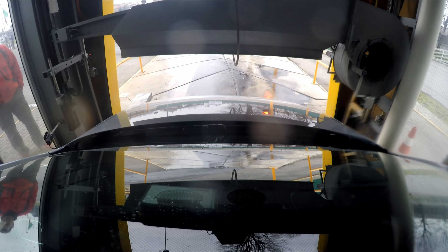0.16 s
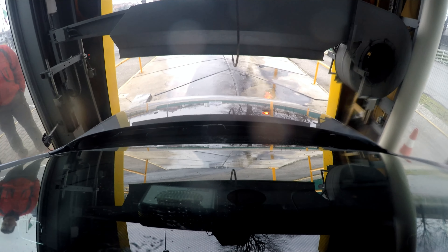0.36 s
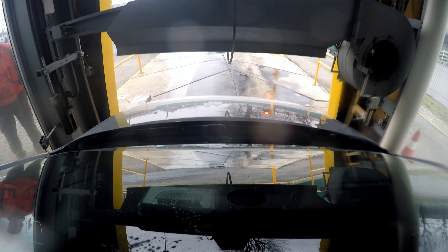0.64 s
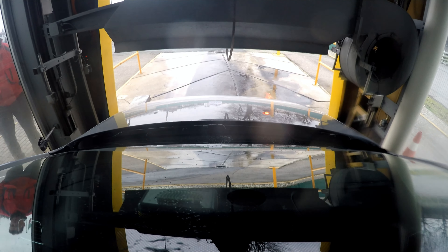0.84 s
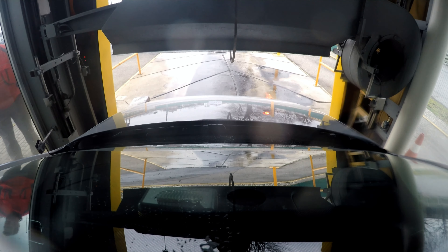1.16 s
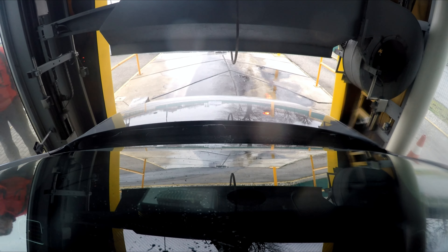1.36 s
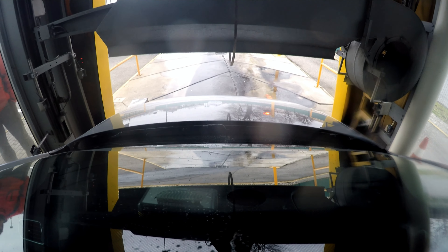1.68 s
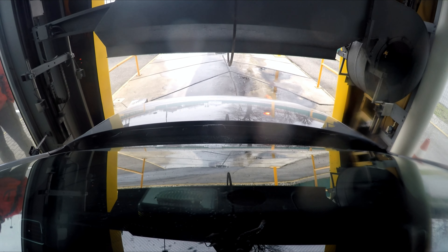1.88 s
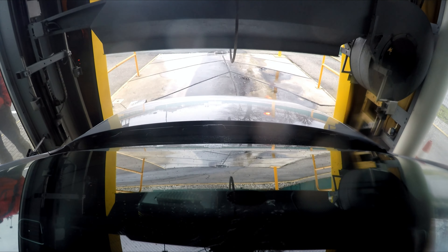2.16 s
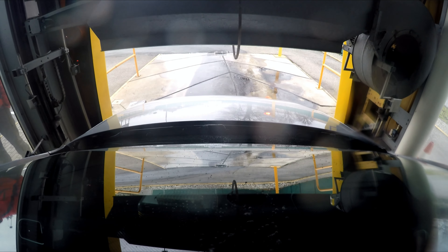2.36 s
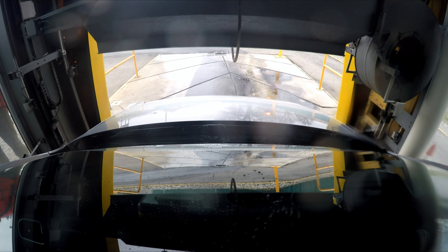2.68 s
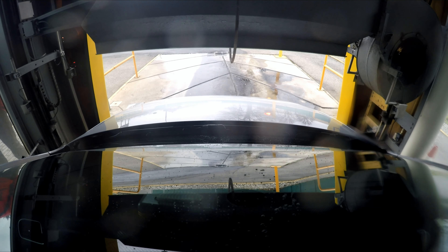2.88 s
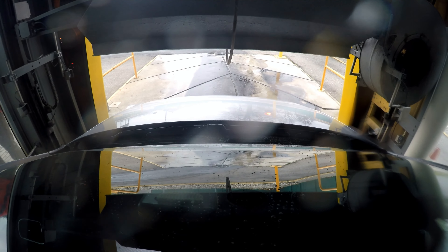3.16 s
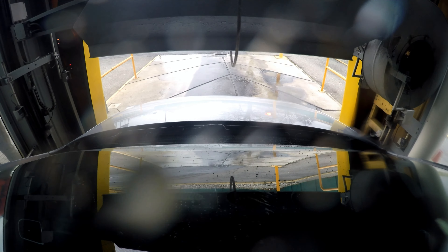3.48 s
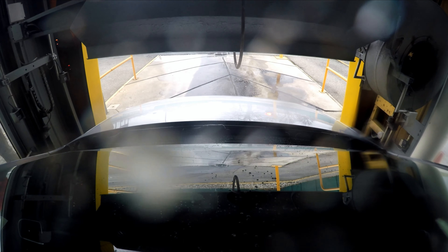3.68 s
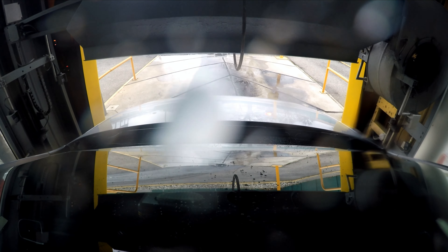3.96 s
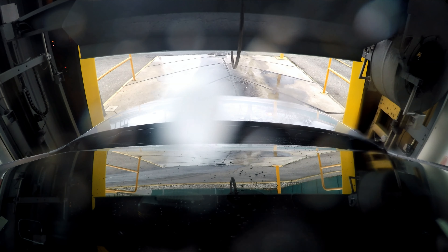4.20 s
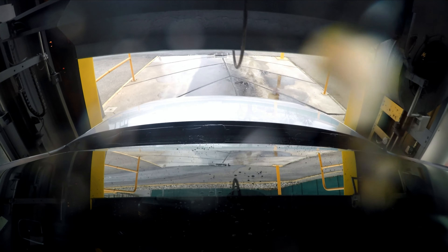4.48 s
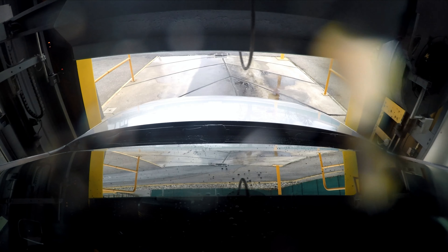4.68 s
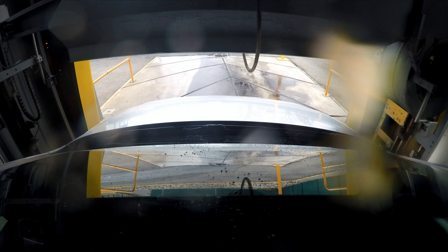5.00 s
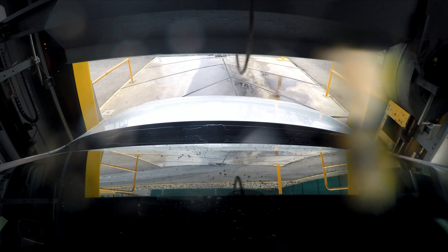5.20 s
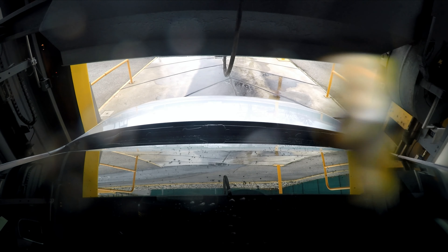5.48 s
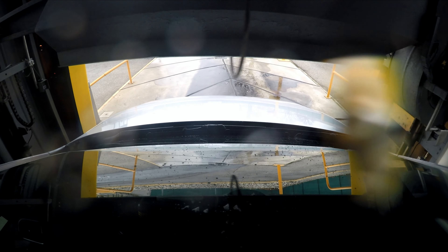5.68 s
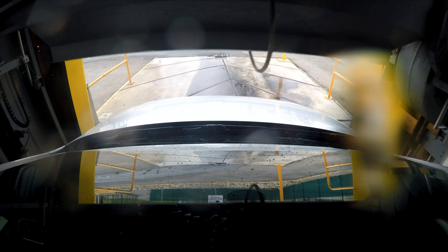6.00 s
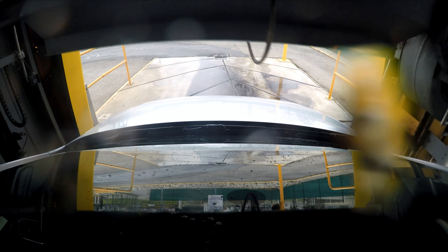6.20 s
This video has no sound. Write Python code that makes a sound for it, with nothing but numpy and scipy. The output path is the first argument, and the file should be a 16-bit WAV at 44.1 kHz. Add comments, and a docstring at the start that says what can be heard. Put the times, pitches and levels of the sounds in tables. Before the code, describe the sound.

Heard from the outside of a car rolling under car wash blowers, a loud rush of air batters the microphone in irregular gusts, rumbling, hissing and lightly whistling. Beneath it the fans keep up a steady roar and whine, with a soft spatter of spray. The fans swell in the last part, joined by a few tiny drop ticks.

```python
"""Car wash dryer.

A car rolls under the blowers with a camera riding on its outside. The fans roar and whine, louder
towards the end. Their turbulent jet buffets the microphone, makes the camera's housing whistle
and hiss in gusts, and flings spray and a few water drops against it."""
import sys
import numpy as np
from scipy import signal
from scipy.fft import rfft, irfft, next_fast_len
from scipy.io import wavfile
from scipy.ndimage import uniform_filter1d, map_coordinates

SR = 44100
rng = np.random.default_rng(int(sys.argv[2]) if len(sys.argv) > 2 else 0)


def int16_out(signal):
    """Quantize to a 16-bit WAV file."""
    q = np.round(np.clip(np.atleast_2d(signal).T, -1, 1) * 32767)
    wavfile.write(sys.argv[1], SR, q.astype(np.int16))


N = 279594

# fan level along the car's path: time_s, level_db
FAN_LEVEL = [(0, -44.5), (1.3, -44.5), (2.4, -46), (3.3, -42.5), (3.7, -42.5), (4.1, -42.5), (4.7, -43),
             (5.05, -40), (5.35, -37), (5.8, -36.5), (6.34, -35.5)]
# mean flow over the camera: time_s, throb_db, buffet_db, whistle_db, hiss_db
MEAN_FLOW = [(0, -14, -18, -28, -30), (.95, -15, -18.5, -25.5, -28), (1.2, -14.5, -23, -29.5, -32.5),
             (1.95, -16, -22, -28.5, -32), (2.65, -19, -19.5, -27, -34), (3.05, -18.5, -20.5, -29.5, -35.5),
             (3.7, -14.5, -19, -27, -32.5), (4.1, -11, -22, -33.5, -41.5), (4.45, -18.5, -26, -31, -34.5),
             (4.8, -14.5, -25.5, -34.5, -36.5), (5.3, -16.5, -23.5, -36, -33), (6.34, -14, -25, -48, -31)]
# jet swings onto the camera: centre_s, width_s, mic_push_db, housing_skim_db
JET_GUSTS = [(.025, 0.074, 2, 4.5), (0.15, 0.03, -4.5, 4.5), (0.285, 0.066, 1, 4.5), (0.388, 0.036, 3, 4),
             (0.468, 0.054, 0, 6), (0.664, 0.023, 2.5, 3.5), (0.81, .05, 2, 3), (0.907, 0.061, 3.5, 2.5),
             (1.052, 0.033, -1.5, 5), (1.09, 0.14, 3, -2), (1.24, 0.092, 4, 5), (1.395, 0.026, 6.5, -3),
             (1.503, 0.12, 8, -0.5), (1.786, 0.077, 8, 4), (2.143, 0.019, 9, 4), (2.262, .06, 4, 5),
             (2.404, 0.063, 6.5, 3), (2.592, 0.032, 1, 5.5), (2.756, 0.1, 2.5, 3.5), (2.87, 0.022, 0, 3),
             (3.074, 0.092, 2, 0.5), (3.343, 0.054, 2.5, -1), (3.444, 0.033, 4, 5),
             (3.612, 0.059, 3.5, 1.5), (3.85, 0.11, -0.5, 2.5), (4.03, 0.031, 6.5, 6.5),
             (4.282, 0.059, 6, 3), (4.36, 0.03, 7.5, 3), (5.016, 0.074, 4.5, 0.5), (5.287, 0.12, 2, -1),
             (5.629, 0.028, 8, 0), (5.81, .08, 6.5, 3), (6.13, 0.043, 9, -9)]
# jet swings clear: centre_s, width_s, depth_db
JET_LULLS = [(0.096, 0.029, 2.5), (.2, 0.043, 3.5), (0.518, 0.035, 6), (0.74, 0.089, 4), (1.18, 0.028, 9.5),
             (1.308, 0.055, 8), (1.62, 0.054, 3), (2.197, 0.02, 8), (3.963, 0.058, 10), (4.148, 0.076, 11),
             (4.586, 0.053, 2), (4.842, .06, 9), (5.092, 0.037, 3), (5.69, 0.039, 11), (5.908, 0.062, 1)]
# biggest vortices shed by the camera: centre_s, throb_boost_db
BIG_VORTICES = [(.06, 6), (.96, 5.5), (1.22, 6.5), (1.54, 10), (1.8, 3), (2.04, 4.5), (2.44, 9), (2.81, 8),
                (3.62, 3.5), (4.37, 5.5), (5.41, 6.5), (5.97, 4), (6.33, 4.5)]
# eddies bursting on the housing: peak_s, level_db, decay_s
EDDY_BURSTS = [(0.006, -26, 0.0093), (0.038, -22, 0.0051), (0.587, -20, 0.008), (0.809, -18, 0.01),
               (0.894, -30, 0.028), (1.029, -12, 0.0064), (1.219, -21, 0.01), (1.495, -15, 0.0038),
               (1.537, -16, 0.012), (1.628, -21.5, 0.011), (1.787, -19.5, 0.006), (2.011, -16.5, 0.007),
               (2.107, -22, 0.015), (2.354, -27, 0.009), (2.442, -15.5, 0.0072), (2.55, -18.5, 0.0062),
               (2.762, -20, 0.008), (2.819, -19, 0.004), (3.05, -22, 0.0058), (3.25, -22, 0.005),
               (3.579, -22, 0.021), (3.687, -21, 0.007), (3.856, -20, 0.007), (3.884, -22, 0.011),
               (4.037, -22, 0.0062), (4.28, -21.5, 0.0069), (4.359, -23, 0.014), (4.92, -23, 0.0085)]
# water drops on the housing: start_s, level_db
DROP_HITS = [(4.8818, -36), (5.3088, -32), (5.7369, -35), (5.792, -28), (5.875, -38), (5.9643, -38),
             (6.1549, -30), (6.2816, -45)]

# noise spectra: freq_hz, density_db
FAN_ROAR_SPECTRUM = [(60, -19), (380, 3), (520, -3), (850, -6.5), (1130, 0), (1480, -4.5), (1800, -1),
                     (2700, -3), (3350, -14.5), (4300, -13.5), (5500, -12), (6700, -18.5), (7800, -27),
                     (9600, -29.5), (15000, -43)]
DROP_SPECTRUM = [(2000, -12), (6000, 5), (10500, -1), (13000, -4), (15500, -7)]
DROPLET_SPECTRUM = [(1000, -14), (2300, 6), (3000, 2), (3900, -5), (5300, -12), (7800, -20), (9800, -23),
                    (11000, -27), (12300, -26), (15000, -37)]
HOUSING_HISS_SPECTRUM = [(400, -1), (900, -8), (1450, -9), (1900, 0.5), (2800, 7), (3300, -2), (4100, -2.5),
                         (4700, -5.5), (5250, -24), (6000, -16), (6600, -17.5), (7700, -18), (9700, -23.5),
                         (10600, -27), (12400, -32), (15000, -56)]
HARD_FLOW_SPECTRUM = [(1500, -18), (2600, 5), (3300, 3), (4200, 3.5), (4700, -8.5), (5250, 0), (6200, -34),
                      (9700, -29), (15000, -40)]
WAKE_THROB_SPECTRUM = [(8, -43), (22, -6), (36, -5.5), (46.5, 1.5), (55, -6), (66, -15.5), (110, -20),
                       (300, -107)]
MIC_BUFFET_SPECTRUM = [(30, -14), (65, 4.5), (90, 1.5), (135, -3), (230, -8), (400, -18), (600, -30.5),
                       (1200, -38), (4000, -73)]
MIC_THUMP_SPECTRUM = [(80, -2.5), (170, 6), (280, 4.5), (430, 2), (600, -16), (1200, -16), (4000, -35.5)]

# resonances and narrow noise bands: centre_hz, width_hz, level_db
BLADE_TONES = [(577.6, 9.6, -4.5), (728, 14, -9), (1154, 11, -7), (1172, 120, 0), (1320, 23, -10),
               (1703, 67, -2.8)]
NOZZLE_MODES = [(3685, 300, 0)]
CAVITY_MODES = [(1845, 610, -2), (2100, 410, 4), (2260, 150, -2)]
HOUSING_EDGE_TONE = [(2257, 260, 0)]
HOUSING_UPPER_MODES = [(5240, 630, 4), (6720, 240, -5), (9700, 500, -11.5), (12000, 900, -15)]


def amp(db):
    """Decibels to gain."""
    return 10 ** (np.asarray(db) / 20)


def unit_rms(x):
    """Scale to rms 1."""
    return x / np.sqrt(np.mean(x ** 2) + 1e-20)


def curves(rows):
    """Per-sample curve for each column after time_s."""
    time_s, *columns = np.transpose(rows)
    return [np.interp(np.arange(N) / SR, time_s, column) for column in columns]


def swell(centre_s, width_s):
    """Bell of height 1, width_s wide at half height."""
    distance = np.minimum(np.abs(np.arange(N) / SR - centre_s) / width_s, 2)
    return .5 ** ((2 * distance) ** 2)


def wobble(rate_hz):
    """Smooth random curve, rate_hz knots a second."""
    knots = rng.standard_normal(4096)
    grid_s = np.linspace(0, N / SR, N // 16)
    spline = map_coordinates(knots, [grid_s * rate_hz], mode="wrap")
    return np.interp(np.arange(N) / SR, grid_s, spline)


def flutter(rate_hz, drift_s=0.057):
    """Quick turbulence without slow drift, rms 1."""
    quick = wobble(rate_hz)
    return unit_rms(quick - uniform_filter1d(quick, size=int(SR * drift_s)))


def filtered(x, response):
    """Zero-phase filter with gain response(hz)."""
    size = next_fast_len(N + SR // 2)
    return irfft(rfft(x, size) * response(np.fft.rfftfreq(size, 1 / SR)), size)[:N]


def shaped_noise(spectrum):
    """Noise with the given spectrum, rms 1."""
    freq_hz, density_db = np.transpose(spectrum)
    response = lambda hz: amp(np.interp(np.log(hz + 1), np.log(freq_hz), density_db))
    return unit_rms(filtered(rng.standard_normal(N), response))


def resonant_noise(modes):
    """Noise ringing in steep-sided resonances, rms 1."""
    def response(hz):
        return sum(amp(level_db) / np.sqrt(width_hz) / (1 + ((hz - centre_hz) / width_hz * 2) ** 2)
                   for centre_hz, width_hz, level_db in modes)
    return unit_rms(filtered(rng.standard_normal(N), response))


def impacts(rate_hz, scatter_db):
    """Randomly timed impulses of uneven strength."""
    hits = rng.random(N) < rate_hz / SR
    return hits * amp(scatter_db * np.clip(rng.standard_normal(N), -2, 1.5))


def blowers(roar_db=10, nozzle_db=-2, whine_db=2.0, waver_db=0.9):
    """Fan roar, nozzle hiss and wavering blade tones grow together as the fans near."""
    fan_db, = curves(FAN_LEVEL)
    unsteadiness = amp(0.3 * wobble(12))
    roar = amp(roar_db) * shaped_noise(FAN_ROAR_SPECTRUM)
    nozzle = amp(nozzle_db) * resonant_noise(NOZZLE_MODES)
    whine = amp(whine_db + waver_db * wobble(25)) * resonant_noise(BLADE_TONES)
    return amp(fan_db) * (unsteadiness * (roar + nozzle) + whine)


def mist(gain_db=6, highpass_hz=6000):
    """Fine spray ticks on the housing, harder near the fans."""
    fan_db, = curves(FAN_LEVEL)
    hits = impacts(rate_hz=40, scatter_db=5)
    return amp(fan_db + gain_db) * filtered(hits, lambda hz: hz / (hz + highpass_hz))


def drops(gain_db=-5, t60_s=0.02):
    """Each drop strikes the housing with a tiny bright tick."""
    envelope = np.zeros(N + SR)
    t = np.arange(SR // 20) / SR
    for start_s, level_db in DROP_HITS:
        envelope[round(start_s * SR):][:len(t)] += amp(level_db + gain_db - 60 * t / t60_s)
    return envelope[:N] * shaped_noise(DROP_SPECTRUM)


def spatter(hiss_db, gain_db=-3.5, splash_s=.0025):
    """Droplets in the jet splash softly on the housing, harder in gusts."""
    hits = impacts(rate_hz=190, scatter_db=3)
    t = np.arange(SR // 100) / SR
    splash = np.sin(np.pi * np.minimum(t / splash_s, 1)) ** 2
    envelope = signal.fftconvolve(hits, splash)[:N]
    return amp(hiss_db + gain_db) * envelope * shaped_noise(DROPLET_SPECTRUM)


def jet_levels_db(jitter_db=0.9, push_jitter_db=0.73, beat_db=2.0, rate_hz=30, skim_lull_share=0.73):
    """Throb, buffet, whistle and hiss levels: mean flow, raised by gusts and vortices, cut by lulls."""
    throb_db, buffet_db, whistle_db, hiss_db = curves(MEAN_FLOW)
    push_db, skim_db = np.zeros((2, N))
    for centre_s, width_s, mic_push_db, housing_skim_db in JET_GUSTS:
        gust = swell(centre_s, width_s)
        push_db += mic_push_db * gust
        skim_db += housing_skim_db * gust
    lull_db = sum(depth_db * swell(centre_s, width_s) for centre_s, width_s, depth_db in JET_LULLS)
    restless_db = jitter_db * wobble(rate_hz)
    push_db += restless_db - lull_db + push_jitter_db * wobble(rate_hz)
    skim_db += restless_db - skim_lull_share * lull_db
    wake_db = sum(boost_db * swell(centre_s, width_s=0.046) for centre_s, boost_db in BIG_VORTICES)
    wake_db += beat_db * flutter(rate_hz, drift_s=0.24)
    return throb_db + wake_db - lull_db, buffet_db + push_db, whistle_db + skim_db, hiss_db + skim_db


def eddies(rise_s=.0012):
    """Envelope of the strong eddies: abrupt arrival, quick decay."""
    power = np.zeros(N + SR)
    t = np.arange(-SR // 100, SR // 16) / SR
    for peak_s, level_db, decay_s in EDDY_BURSTS:
        burst = amp(level_db) ** 2 * np.exp(-(t / np.where(t < 0, rise_s, decay_s)) ** 2)
        start = max(round((peak_s + t[0]) * SR), 0)
        power[start:][:len(t)] += burst
    return np.sqrt(power[:N])


def housing_whistle(whistle_db, swirl, bursts, cavity_db=-3.5, edge_db=-6, burst_db=-8,
                    swirl_db=1.0, puff_db=5.0):
    """Air blows the housing's cavity in puffs; only strong flow locks into an edge tone."""
    puffs = unit_rms(amp(swirl_db * swirl + puff_db * wobble(150)))
    drive = amp(whistle_db + cavity_db) * puffs + amp(burst_db) * bursts
    cavity = drive * resonant_noise(CAVITY_MODES)
    lock = np.clip((whistle_db + 33) / 7, 0, 1)
    edge_tone = amp(whistle_db + edge_db) * lock * resonant_noise(HOUSING_EDGE_TONE)
    return cavity + edge_tone


def housing_hiss(hiss_db, swirl, bursts, flow_db=-4.0, burst_db=-15, modes_db=-13, rasp_db=-7,
                 swirl_db=2.5, tear_db=2.0):
    """Air tears into ragged hiss; sustained hard flow breaks off the edges with a brighter rasp."""
    flow = amp(hiss_db) * unit_rms(amp(swirl_db * swirl))
    drive = amp(flow_db) * flow + amp(burst_db) * bursts
    hiss = shaped_noise(HOUSING_HISS_SPECTRUM)
    ring = amp(modes_db) * resonant_noise(HOUSING_UPPER_MODES)
    sustained_db = uniform_filter1d(hiss_db, size=SR // 3)
    breakaway = np.clip((sustained_db + 31) / 4, 0, 1)
    rasp = amp(rasp_db) * breakaway * flow * shaped_noise(HARD_FLOW_SPECTRUM)
    tearing = unit_rms(amp(tear_db * wobble(500)))
    return (drive * (hiss + ring) + rasp) * tearing


def wake_throb(throb_db, evenness=0.5):
    """The camera sheds vortices of similar strength at a loose rate."""
    analytic = signal.hilbert(shaped_noise(WAKE_THROB_SPECTRUM))
    levelled = analytic.real / (np.abs(analytic) + .2) ** evenness
    return amp(throb_db) * unit_rms(levelled)


def buffeting(buffet_db, swirl, bursts, rumble_db=0.6, thump_db=-14, burst_db=-8, lump_db=1.5):
    """Eddies thump on the microphone; harder pushes break into smaller, brighter ones."""
    lumps = amp(lump_db * (.5 * swirl + flutter(70)))
    rumble = amp(buffet_db + rumble_db) * unit_rms(lumps * shaped_noise(MIC_BUFFET_SPECTRUM))
    hardness = np.clip((buffet_db + 21) / 7, 0, 1)
    thump_drive = amp(buffet_db + thump_db) * hardness + amp(burst_db) * bursts
    return rumble + thump_drive * shaped_noise(MIC_THUMP_SPECTRUM)


def scene():
    """One turbulent jet drives all the wind noise, over the fans and their spray. Mono."""
    throb_db, buffet_db, whistle_db, hiss_db = jet_levels_db()
    swirl, bursts = flutter(70), eddies()
    wind = wake_throb(throb_db) + buffeting(buffet_db, swirl, bursts)
    housing = housing_whistle(whistle_db, swirl, bursts) + housing_hiss(hiss_db, swirl, bursts)
    return (blowers() + wind + housing + spatter(hiss_db) + drops() + mist())[None]


def record(dry, ceiling=.92, cutoff_hz=15250):
    """The camera rounds off the highest peaks, then limits the band."""
    rounded = dry[0] / (1 + (dry[0] / ceiling) ** 8) ** (1 / 8)
    return filtered(rounded, lambda hz: hz < cutoff_hz)[None]


dry = scene()
out = record(dry)
int16_out(out)
```